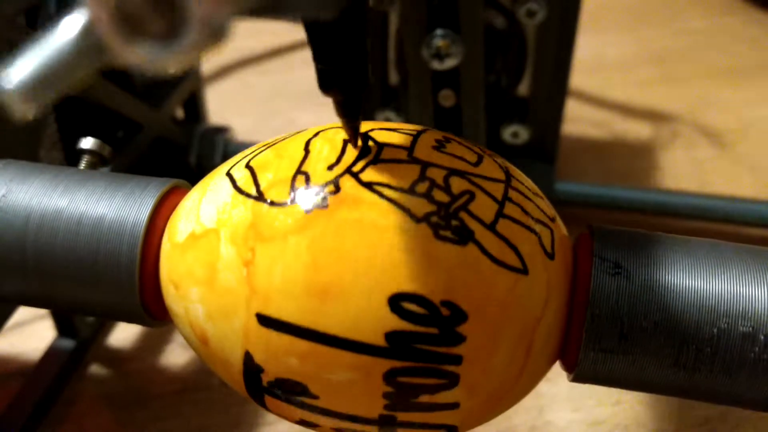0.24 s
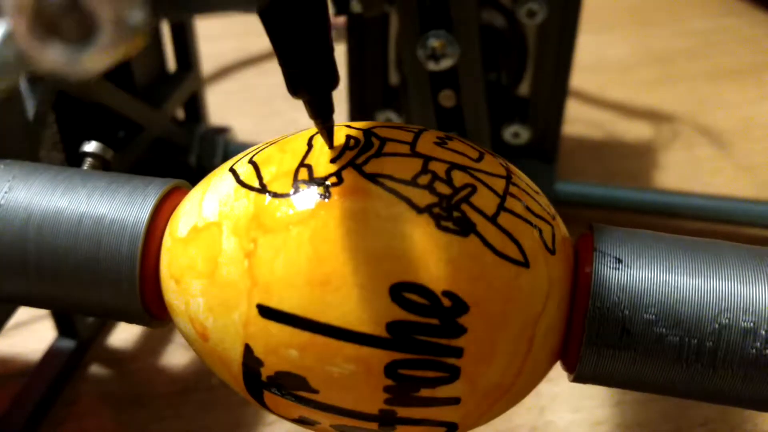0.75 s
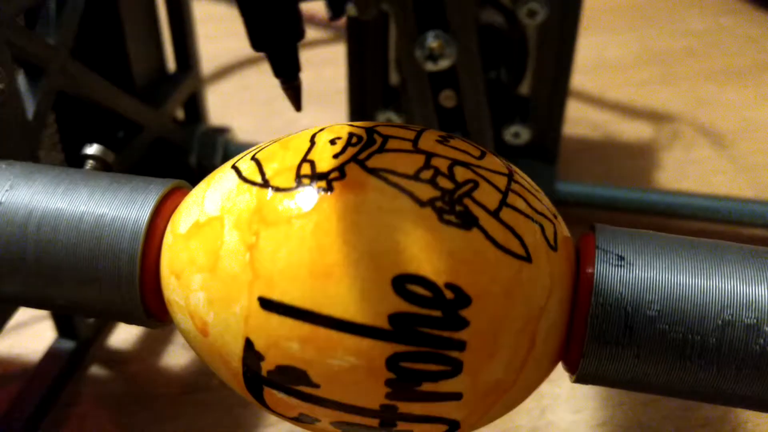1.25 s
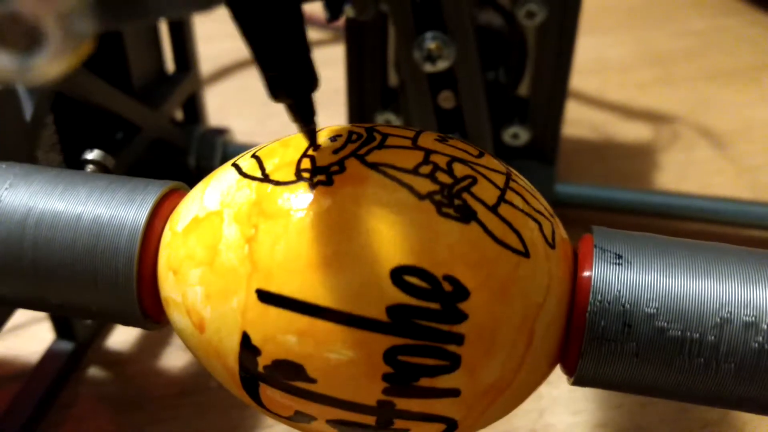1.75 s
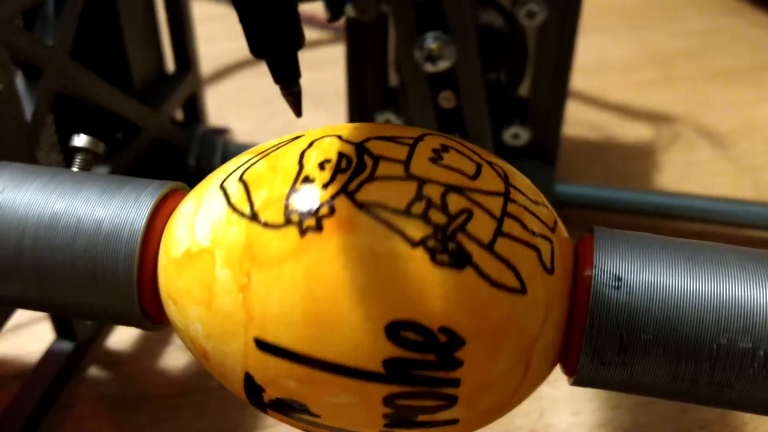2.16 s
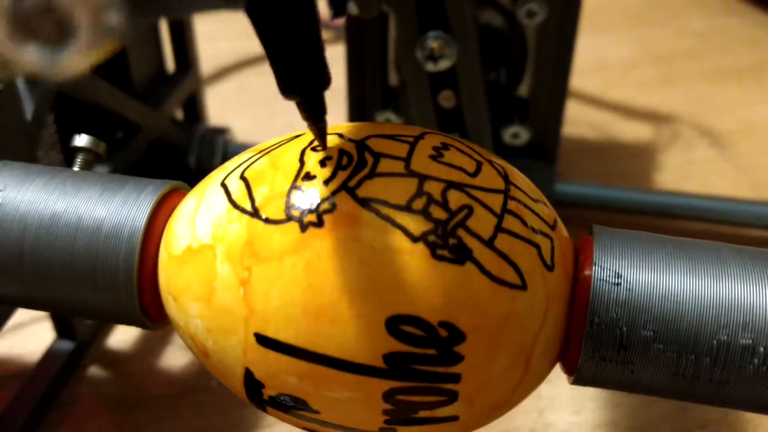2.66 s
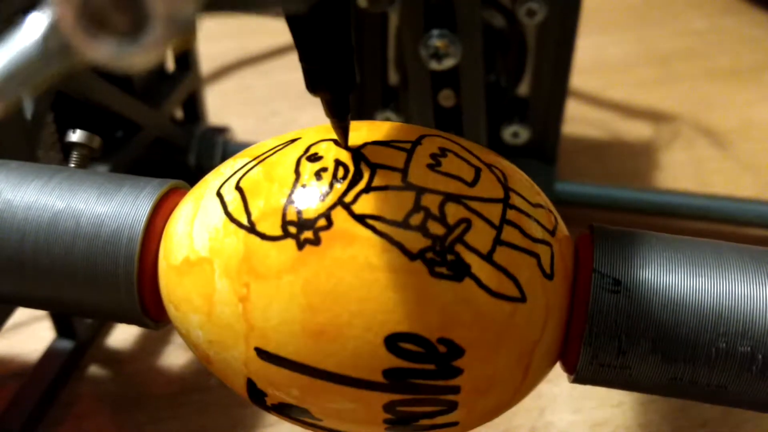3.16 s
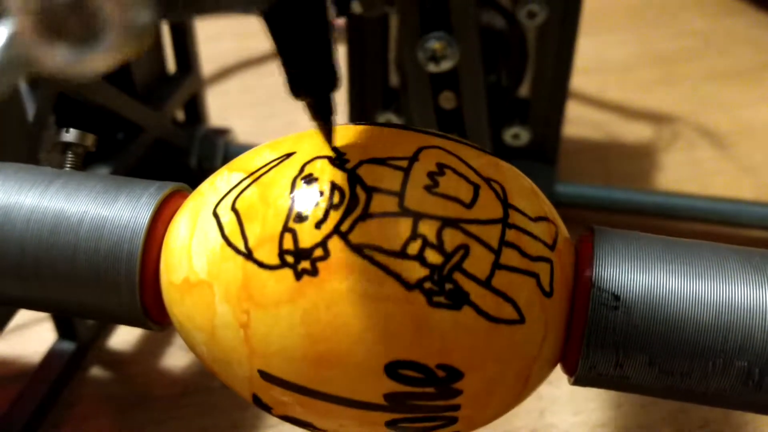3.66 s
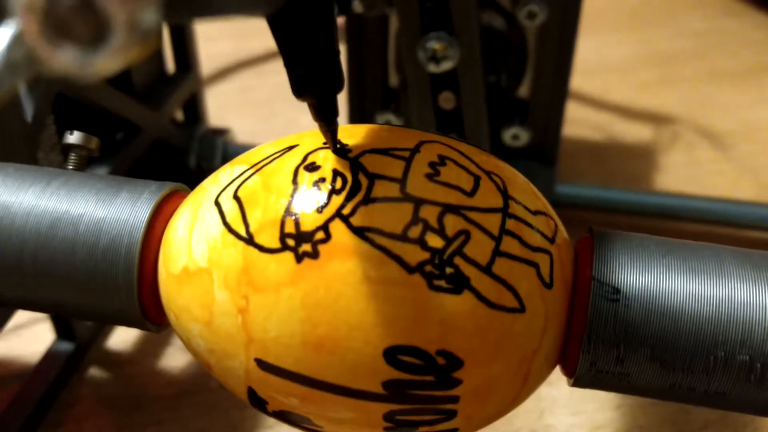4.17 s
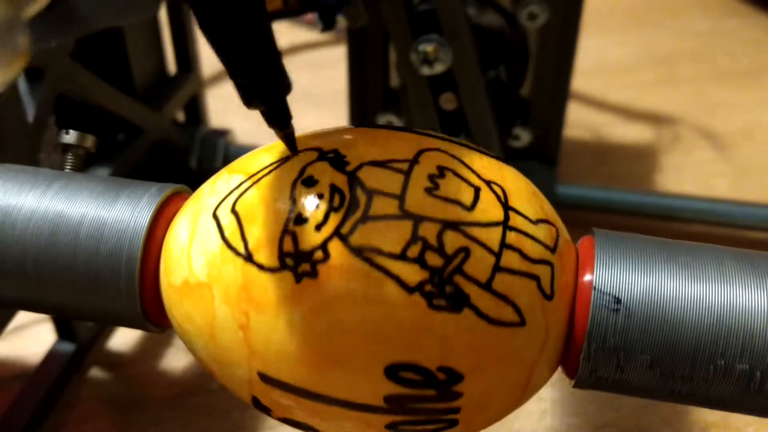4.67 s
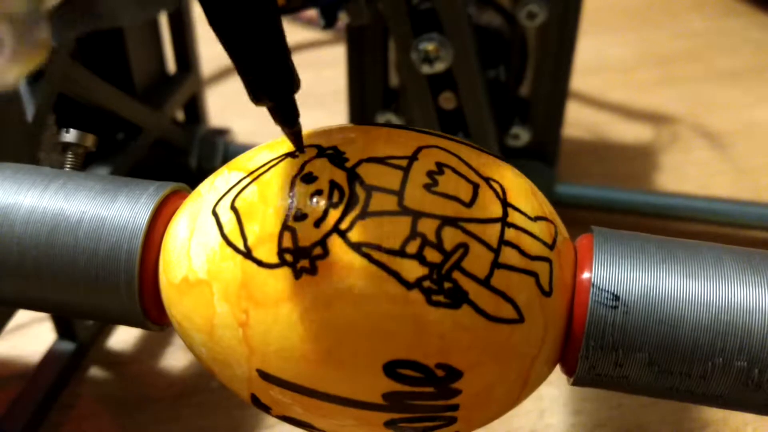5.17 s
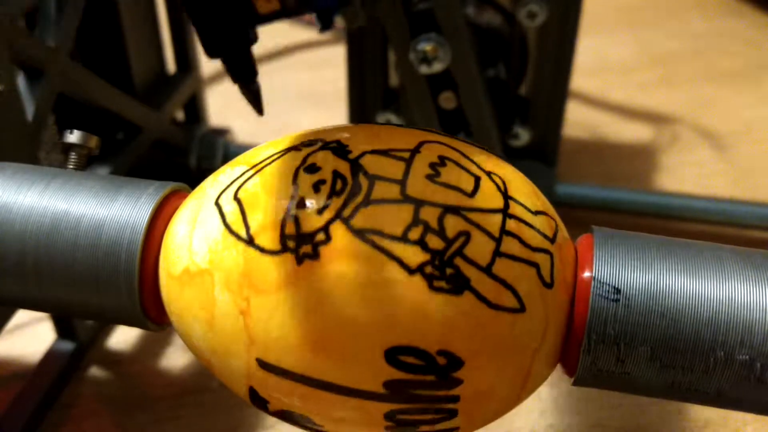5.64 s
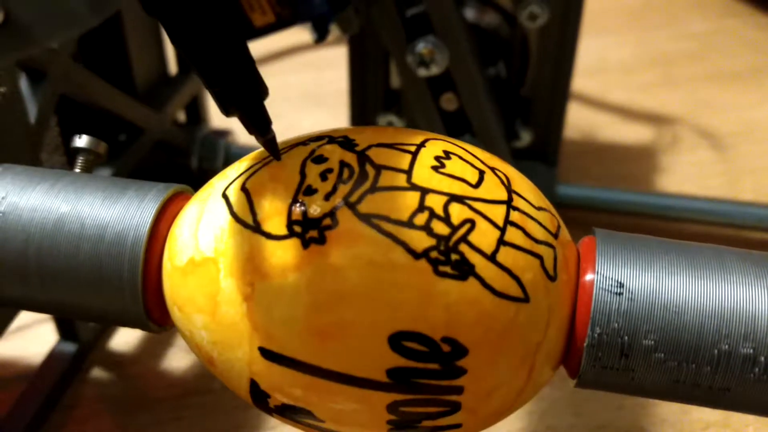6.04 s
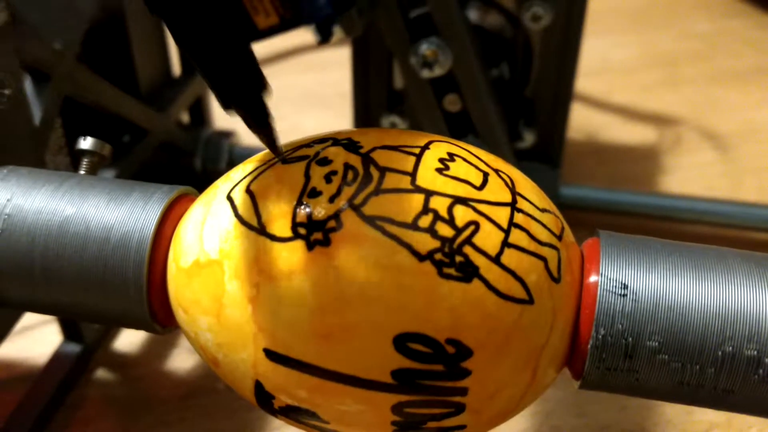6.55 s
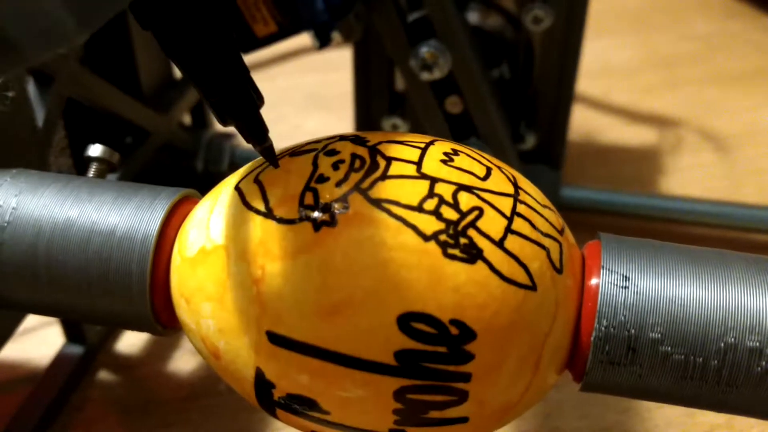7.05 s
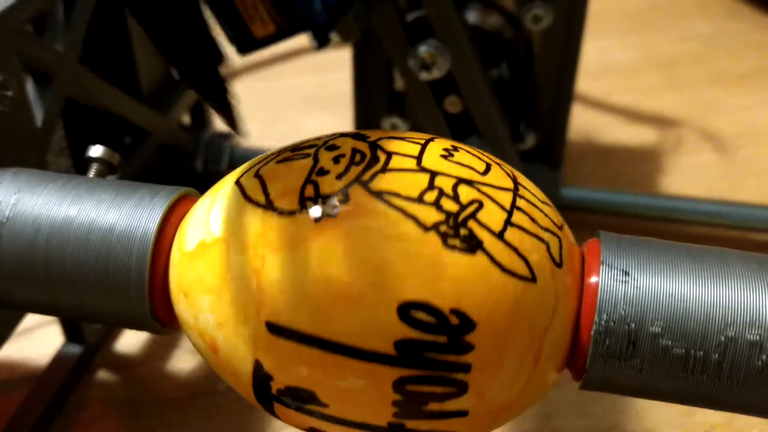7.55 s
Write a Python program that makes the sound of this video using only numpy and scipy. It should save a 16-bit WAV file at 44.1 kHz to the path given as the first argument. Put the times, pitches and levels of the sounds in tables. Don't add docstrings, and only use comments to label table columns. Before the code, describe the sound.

A small drawing machine whines thinly indoors, its tiny servo giving short gritty whirs as the pen arm lands with dull knocks about once a second.

```python
import sys
import numpy as np
from scipy import signal
from scipy.fft import rfft, irfft, next_fast_len
from scipy.io import wavfile

SR = 44100
rng = np.random.default_rng(int(sys.argv[2]) if len(sys.argv) > 2 else 0)


def level_to_linear(level):
    exponent = np.asarray(level, float) / 20
    return 10 ** exponent


def store_pcm(level_fs):
    pcm = np.round(np.clip(level_fs, -1, 1) * 32767).astype(np.int16)
    wavfile.write(sys.argv[1], SR, np.atleast_2d(pcm).T)


N = 344421

# start_s, electrical_turns_per_s, warble_db
STEPPER_MOVES = [(0.0, 44, -50), (0.13, 22, -46), (0.5, 41, -56), (0.95, 25, -57), (1.18, 16, -54),
                 (1.7, 30, -53), (1.79, 13, -46), (1.98, 48, -53), (2.55, 20, -51), (2.65, 12, -48),
                 (2.89, 23, -55), (3.41, 18, -56), (3.58, 14, -53), (3.9, 20, -55), (4.37, 15, -52),
                 (4.5, 19, -53), (4.65, 12, -52), (4.9, 20, -56), (5.33, 17, -56), (5.59, 18, -55),
                 (6.16, 12, -53), (6.3, 20, -52), (6.58, 19, -54), (7.08, 34, -53), (7.22, 16, -51),
                 (7.53, 19, -54)]
# start_s, level_db, right_port_louder_db
STEPPER_HOLDS = [(0.315, -57, 5), (0.4, -67, 4), (0.57, -55, 4), (1.02, -56, 1.5), (1.31, -48, -.5),
                 (1.87, -54, 3.3), (2.2, -60, 6.5), (2.75, -50, 2), (3.03, -55, -1), (3.74, -50, .3),
                 (3.98, -57, .7), (4.79, -53, 2), (4.96, -61, 3.5), (5.45, -61, 1), (5.8, -58, 1.5),
                 (6.46, -61, 3), (6.7, -52.5, 2.5), (7.4, -54, 2), (7.63, -53, 2)]
# pitch_hz, level_db (rms)
FAINT_LINES = [(797, -71), (2300, -80), (3800, -82), (4330, -78), (4700, -79)]
CHOPPER_HZ = 1551.7
STEADY_SHARE_DB, TRAVEL_SHARE_DB, TRAVEL_S, TURNING_RIGHT_DB = -5, -12, .2, 2

# time_s, level_db
DESK_RUMBLE = [(0.0, -49), (0.26, -48), (0.43, -57), (1.11, -58), (1.63, -50.5), (2.09, -55.5),
               (2.5, -51.5), (3.5, -58), (3.72, -53), (4.24, -59), (4.68, -52.5), (4.85, -59), (5.13, -59),
               (6.37, -52.5), (6.63, -54.5), (7.24, -50), (7.46, -55.5), (7.81, -57)]
# pitch_hz, level_db (per Hz)
BACKGROUND_COLOUR = [(40, -16), (80, -16), (130, 5), (230, 4.5), (300, 4.5), (400, 0.5), (700, -2.5),
                     (1100, -18.5), (2000, -27.5), (4000, -32), (8000, -35.5), (10500, -41.5), (13500, -46),
                     (15500, -41)]
HISS_DB, HISS_FOLLOWS = -60, 0.72

# start_s, peak_db
FRAME_KNOCKS = [(0.127, -51), (0.186, -66), (0.242, -49.5), (0.396, -49.5), (0.52, -50), (1.626, -56),
                (1.762, -49.5), (2.653, -50), (2.922, -51.5), (3.482, -51), (4.598, -48), (4.741, -51.5),
                (6.254, -48.5), (6.388, -43.5), (6.477, -50), (7.156, -43.5), (7.188, -54), (7.349, -42)]
# start_s, peak_db, crack_db
PEN_LANDINGS = [
    (0.703, -25, -45),
    (1.446, -20, -44),
    (2.328, -22, -44),
    (3.165, -23, -44),
    (4.102, -25, -46),
    (5.095, -28, -45.5),
    (5.908, -23, -44.5),
    (6.831, -22.5, -43),
    (7.77, -22, -43.5),
]
# after_touch_s, level_db
LANDING_BOUNCES = [
    (0, -2.5),
    (.003, 3),
    (.0095, 0),
    (0.015, 0),
    (.031, -17),
    (.041, -27),
    (.06, -25),
]
# pitch_hz, level_db, t60_s
FRAME_MODES = [(129.4, -17.5, 0.79), (174.5, -13.5, 0.13), (226, -12.5, 0.23), (242, -19, 0.16),
               (270.5, -17, 0.25), (314, -14, 0.2), (319, 4.5, 0.027), (462.5, -9.5, 0.24),
               (498.3, -17.5, 0.3), (563.3, 4.5, 0.056), (558.3, -1.5, 0.083), (605.6, -8, 0.088),
               (697, -7, 0.041), (918, -26.5, 0.27), (1194, -15, 0.11)]
# pitch_hz, level_db (per Hz)
CRACK_COLOUR = [(800, -2), (1300, 0), (2200, -5), (3400, -11), (4500, -3), (6600, -2), (8600, -7),
                (9500, -9), (12000, -10), (13000, -16), (15500, -16)]

ROOM_T60_S, ROOM_DB = 0.39, -12

# start_s, kick_db, full_speed_db
PEN_LIFTS = [
    (0.365, -37.5, -39),
    (1.042, -45.5, -39),
    (1.841, -37, -38.5),
    (2.743, -38, -37.5),
    (3.743, -39.5, -36.5),
    (4.765, -38, -39),
    (5.438, -46.5, -38),
    (6.444, -38, -37.5),
    (7.387, -35.5, -39.5),
]
# start_s, running_db, pressing_db (once landed)
PEN_DROPS = [
    (0.62, -51, -47.5),
    (1.358, -50, -40.5),
    (2.238, -50.5, -40.5),
    (3.079, -49.5, -47.5),
    (4.018, -50.5, -43.5),
    (4.998, -56, -47),
    (5.82, -49.5, -41.5),
    (6.74, -49, -41.5),
    (7.678, -50.5, -44),
]
# start_s, peak_db
HOLD_TWITCHES = [(0.5322, -41), (0.5618, -38), (0.5713, -36), (1.8302, -38.5), (1.8345, -35),
                 (2.7134, -36.5), (2.7228, -44), (3.48, -40), (3.5076, -35), (3.5177, -37), (3.552, -38.5),
                 (4.0093, -41), (4.4378, -45), (5.402, -41), (5.411, -47), (5.4297, -37), (5.441, -40),
                 (5.655, -40.5), (5.7932, -47), (6.368, -36), (7.0828, -45), (7.6525, -47)]
# start_s, peak_db
TOOTH_SNAGS = [(0.4045, -25), (0.7136, -23), (1.4577, -36), (1.873, -32), (2.3375, -33), (3.1765, -29),
               (3.7838, -24), (4.114, -19.5), (4.818, -34), (5.1068, -24.5), (5.4959, -26), (5.9217, -27),
               (6.502, -36), (6.5164, -23), (7.426, -34)]
STIR_TIMES = [.357, 2.695, 3.071, 3.728]
STIR_DB, TWITCH_GAIN_DB, SNAG_GAIN_DB = -46, 2, -1.0
# pitch_hz, level_db (per Hz)
GEAR_COLOUR = [(700, -26), (1200, -2), (2000, -2.5), (3000, -3), (3350, -25), (3700, 1), (4300, 0.5),
               (5300, -0.5), (7000, -1.5), (8700, -0.5), (10000, -4), (12200, 0.5), (14000, -6),
               (15500, -10)]
# pitch_hz, width_hz, level_db
GEAR_CASE = [(1150, 60, -19), (1260, 60, -17), (3700, 120, -17), (4330, 150, -12), (4700, 120, -14),
             (6050, 120, -13), (6400, 120, -14), (6800, 120, -12), (7250, 150, -10), (8050, 150, -13),
             (8700, 150, -17), (11000, 200, -18), (12170, 150, -13), (13300, 400, -14)]
CASE_DB = -6
# pitch_hz, level_db (per Hz)
TWITCH_COLOUR = [(3500, -16), (4600, 1.5), (5500, -7.5), (7000, 3.5), (8500, -12), (12500, -3.5),
                 (15500, -9)]
# after_lift_s, length_s, from_hz, to_hz, level_db
RUN_DOWN = (.066, .045, 2500, 1750, -65)

START_DB, COAST_DB = -15, -23
KICK_S, KICK_DIP_S, FULL_SPEED_S, BRAKE_S, LIFT_END_S = .009, .036, 0.075, 0.095, 0.13
KICK_DIP_DB, BRAKE_DB = -3, -4.5
DROP_KICK_S, LAND_S, JOLT_S, PRESS_END_S, DROP_END_S = 0.0054, 0.0766, 0.02, 0.18, 0.23
JOLT_DB = -1
LIFT_BRIGHT_DB, DROP_BRIGHT_DB, DULLING_DB_PER_S, COAST_BRIGHT_DB = -2, -1, -97, -16.0

# pitch_hz, lead_half_turns
RIGHT_LEAD = [(0, .85), (80, .65), (150, .28), (1000, .22), (1500, .97), (1680, 1), (1840, 1.02),
              (1950, 1.17), (8900, 9.02), (9600, 9.9), (10100, 9.95), (10350, 9), (11000, 8.95),
              (11350, 8.12), (12300, 7.95), (12600, 7.3), (14300, 6.8), (14600, 6), (22050, 6)]
# pitch_hz, likeness (0-1)
SIDE_LIKENESS = [(60, .2), (200, .7), (1000, .9), (1600, .97), (1700, .998), (1900, .998), (2700, .6),
                 (3500, .87), (5300, .995), (6300, .98), (8000, .85), (10000, .8), (10650, .995),
                 (11200, .6), (12000, .8), (12600, .5), (14300, .5), (15000, .97), (15500, .3)]


def in_time(rows):
    s, *columns = np.transpose(rows)
    return [np.interp(np.arange(N) / SR, s, c) for c in columns]


def rms_one(x):
    return x / np.sqrt(np.mean(x ** 2))


def coloured(x, spectrum, low_hz, high_hz):
    size = next_fast_len(x.shape[1])
    hz = np.arange(size // 2 + 1) * SR / size + 1
    colour_hz, colour_db = np.transpose(spectrum)
    level_db = np.interp(np.log(hz), np.log(colour_hz), colour_db)
    edges = 1 / np.sqrt((1 + (low_hz / hz) ** 8) * (1 + (hz / high_hz) ** 8))
    alike = np.interp(hz, *np.transpose(SIDE_LIKENESS))
    mid, side = rfft(x, size) * level_to_linear(level_db) * edges
    ports = np.sqrt(1 + alike) * mid + np.sqrt(1 - alike) * side * [[1], [-1]]
    return rms_one(irfft(ports, size)[:, :x.shape[1]])


def smooth(x, hz):
    r = np.exp(-2 * np.pi * hz / SR)
    return signal.lfilter([1 - r], [1, -r], x + 1e-18)


def drift(hz):
    return rms_one(smooth(smooth(rng.standard_normal(N + SR), hz), hz)[SR:])


def pair():
    return rng.standard_normal((2, N))


def clicks(times, levels_db):
    out = np.zeros(N + SR)
    np.add.at(out, (np.asarray(times) * SR).astype(int), level_to_linear(np.asarray(levels_db)))
    return out[:N]


def resonance(x, hz, width_hz):
    r = np.exp(-np.pi * width_hz / SR)
    return rms_one(signal.lfilter([1, 0, -1], [1, -2 * r * np.cos(2 * np.pi * hz / SR), r * r], x))


def steppers():
    states = [(s, 0, db, -90, right_db) for s, db, right_db in STEPPER_HOLDS]
    for s, turns, db in STEPPER_MOVES:
        travelling = any(0 < s - row[0] < TRAVEL_S for row in PEN_LIFTS)
        share_db = TRAVEL_SHARE_DB if travelling else STEADY_SHARE_DB
        states.append((s, turns, db + share_db, db, TURNING_RIGHT_DB))
    s, turns, steady_db, warble_db, right_db = np.transpose(sorted(states))
    now = np.searchsorted(s * SR, np.arange(N), side="right") - 1
    both_draw = (steady_db - warble_db > -8)[now]
    speed = turns[now] * (1 + np.where(both_draw, .15, .04) * drift(8))
    angle = 2 * np.pi * np.cumsum(speed) / SR
    swell = 1.2 * np.cos(angle) + .4 * np.cos(2 * angle + 1) + .4 * np.cos(3 * angle + 2)
    swell = swell + np.where(both_draw, .7j, .25j) * np.cos(1.6 * angle)
    size = level_to_linear(steady_db[now] + .6 * drift(15)) + level_to_linear(warble_db[now] + .3 + 2 * drift(10)) * swell
    t = np.arange(N) / SR
    apart = np.array([[0], [1]]) * (.14 + .2 * drift(3))
    carrier = np.exp(1j * (2 * np.pi * CHOPPER_HZ * t + apart))
    whine = np.sqrt(2) * np.imag(smooth(smooth(size, 120), 120) * carrier)
    whine = whine * level_to_linear([[0], [1]] * smooth(right_db[now], 30))
    whine += level_to_linear(-69) * resonance(resonance(pair(), CHOPPER_HZ, 70), CHOPPER_HZ, 70)
    for hz, db in FAINT_LINES:
        whine = whine + np.sqrt(2) * level_to_linear(db + 3.5 * drift(6)) * np.sin(2 * np.pi * hz * t)
    return whine


def ground():
    rumble_db, = in_time(DESK_RUMBLE)
    hiss_db = HISS_DB + HISS_FOLLOWS * (rumble_db - rumble_db.mean())
    shake = pair() * level_to_linear(1.75 * drift(41))
    shake += level_to_linear(-21.0) * resonance(shake, 231.0, 47) + level_to_linear(-21.0) * resonance(shake, 780, 73)
    rumble = level_to_linear(rumble_db - 1.0) * coloured(shake, BACKGROUND_COLOUR, 28, 1500)
    hiss = level_to_linear(hiss_db) * coloured(pair(), BACKGROUND_COLOUR, 1252, 23400)
    capsule = level_to_linear(-73.5) * coloured(pair(), [(9000, 0), (16000, 0)], 12500, 15500)
    return capsule + rumble + hiss


def frame():
    touch, peak_db, crack_db = np.transpose(PEN_LANDINGS)
    after, bounce_db = np.transpose(LANDING_BOUNCES)
    times = (touch[:, None] + after * rng.uniform(.97, 1.03, (len(touch), 1))).ravel()
    knock_s, knock_db = np.transpose(FRAME_KNOCKS)
    body = np.zeros(N)
    for k, (hz, mode_db, t60) in enumerate(FRAME_MODES):
        blows_db = peak_db[:, None] + bounce_db - 9.0 + rng.normal(0, 2.92, (len(touch), len(after)))
        light = clicks(knock_s, knock_db + 7.5 - 23.6 * abs(np.log2(hz / 620)))
        blows = clicks(times, blows_db.ravel()) + light + 1e-18
        r, w = level_to_linear(-60 / (t60 * SR)), 2 * np.pi * hz / SR
        ringing = signal.lfilter([0, np.sin(w)], [1, -2 * r * np.cos(w), r * r], blows)
        body += (-1) ** k * level_to_linear(mode_db) * ringing
    body = signal.sosfilt(signal.butter(4, [95, 2500], "band", fs=SR, output="sos"), body)
    fall = level_to_linear(-60 / (.06 * SR))
    cracks = clicks(times, (crack_db[:, None] + bounce_db + 6.0).ravel())
    crack = signal.lfilter([1], [1, -fall], cracks + 1e-18)
    grit = coloured(pair(), CRACK_COLOUR, 607, 15700) + level_to_linear(-10.5) * resonance(pair(), 1420, 1360)
    return body + smooth(crack, 600) * grit


def room(x):
    t = np.arange(int(.5 * SR)) / SR
    colour = [(100, 0), (6000, 1.5), (9000, 4.5), (15000, -27.5)]
    tail = coloured(rng.standard_normal((2, len(t))), colour, 49, 15600)
    tail = tail * (t > .004) * level_to_linear(-60 * t / ROOM_T60_S) / np.sqrt(ROOM_T60_S * SR / 14)
    return signal.fftconvolve(np.mean(x, axis=0, keepdims=True), tail, axes=1)[:, :N]


def lift(s, kick_db, full_db):
    return [(s, kick_db + START_DB, LIFT_BRIGHT_DB - 4.0),
            (s + KICK_S, kick_db, LIFT_BRIGHT_DB),
            (s + KICK_DIP_S, (kick_db + full_db) / 2 + KICK_DIP_DB, LIFT_BRIGHT_DB),
            (s + FULL_SPEED_S, full_db, LIFT_BRIGHT_DB + 4.0),
            (s + BRAKE_S, full_db + BRAKE_DB, LIFT_BRIGHT_DB),
            (s + LIFT_END_S, full_db + COAST_DB, COAST_BRIGHT_DB)]


def drop(s, run_db, press_db):
    after = [0, DROP_KICK_S, LAND_S, LAND_S + JOLT_S, LAND_S + 2 * JOLT_S, PRESS_END_S, DROP_END_S]
    gear_db = [run_db + START_DB, run_db, run_db + 3.5,
               press_db + JOLT_DB, press_db - 1.0, press_db, press_db + COAST_DB]
    return [(s + a, db, DROP_BRIGHT_DB + DULLING_DB_PER_S * a) for a, db in zip(after, gear_db)]


def servo():
    teeth = (rng.random(N) < 6000 / SR) * level_to_linear(1.8 * np.minimum(rng.exponential(1, N), 4))
    chatter = rms_one(pair() * (0.72 + teeth) * level_to_linear(1.67 * drift(67)))
    case = sum(level_to_linear(CASE_DB + db + 5.9 * drift(32)) * resonance(chatter, hz, width_hz)
               for hz, width_hz, db in GEAR_CASE)
    chatter = chatter + case
    body = coloured(chatter, GEAR_COLOUR, 600, 9400)
    bright = coloured(chatter, GEAR_COLOUR, 9400, 15600)
    curve = []
    for run in sorted([lift(*row) for row in PEN_LIFTS] + [drop(*row) for row in PEN_DROPS]):
        curve += [(run[0][0] - .004, -90, 0), *run, (run[-1][0] + 0.013, -90, 0)]
    gear_db, bright_db = in_time(curve)
    whir = level_to_linear(gear_db - 1.5) * (body + level_to_linear(bright_db) * bright)
    jerks = clicks(STIR_TIMES, STIR_DB)
    jerks = jerks + level_to_linear(TWITCH_GAIN_DB) * clicks(*np.transpose(HOLD_TWITCHES))
    jerks = jerks + level_to_linear(SNAG_GAIN_DB) * clicks(*np.transpose(TOOTH_SNAGS))
    burst = np.convolve(jerks, np.hanning(180))[:N]
    return whir + level_to_linear(-6.0) * burst * coloured(pair(), TWITCH_COLOUR, 3400, 18500)


def run_down():
    after, length, from_hz, to_hz, db = RUN_DOWN
    hz = np.linspace(from_hz, to_hz, int(length * SR))
    tone = np.hanning(len(hz)) * np.sin(2 * np.pi * np.cumsum(hz) / SR)
    times = [row[0] + after for row in PEN_LIFTS]
    return np.convolve(clicks(times, db + 6 + rng.normal(0, 2, len(times))), tone)[:N]


def scene():
    machine = servo() + run_down() + frame()
    return machine + level_to_linear(ROOM_DB) * room(machine) + steppers() + ground()


def band_limit(x):
    return signal.sosfilt(signal.butter(12, 16360, fs=SR, output="sos"), x)


def record(dry):
    size = next_fast_len(N + 2048)
    hz = np.arange(size // 2 + 1) * SR / size
    lead = np.exp(1j * np.pi * np.interp(hz, *np.transpose(RIGHT_LEAD)))
    right = irfft(rfft(dry[1], size) * lead, size)[:N]
    ports = np.array([dry[0], right])
    mix = signal.sosfilt(signal.cheby2(16, 50, 16150, fs=SR, output="sos"), ports)
    return band_limit(mix)


dry = scene()
out = record(dry)
store_pcm(out)
```